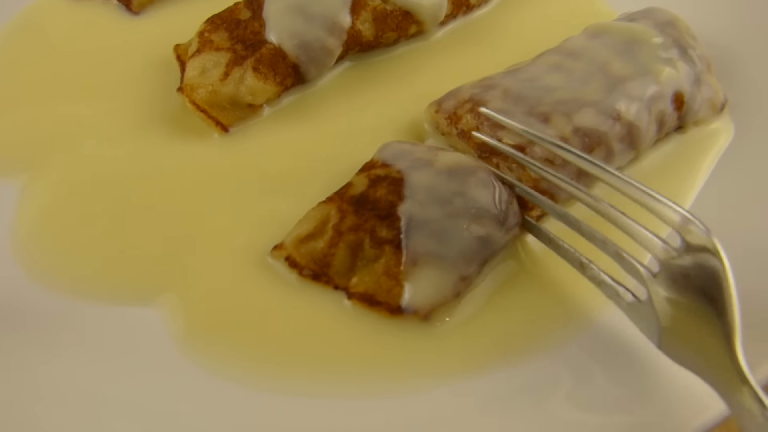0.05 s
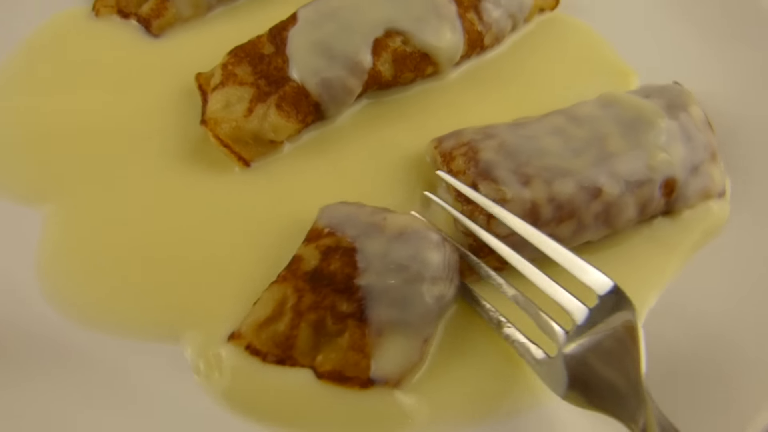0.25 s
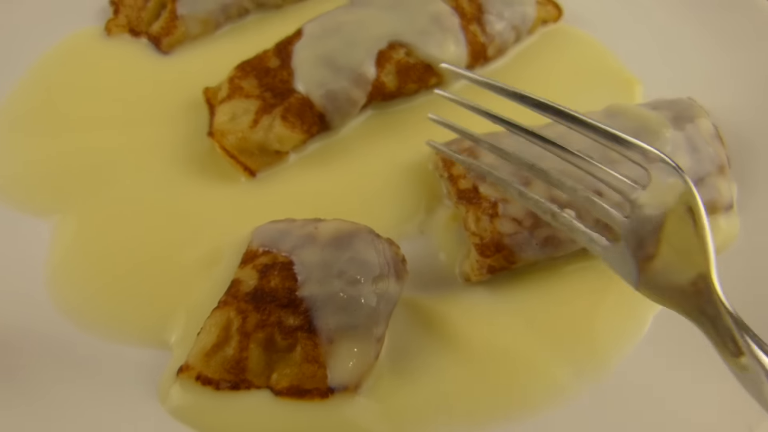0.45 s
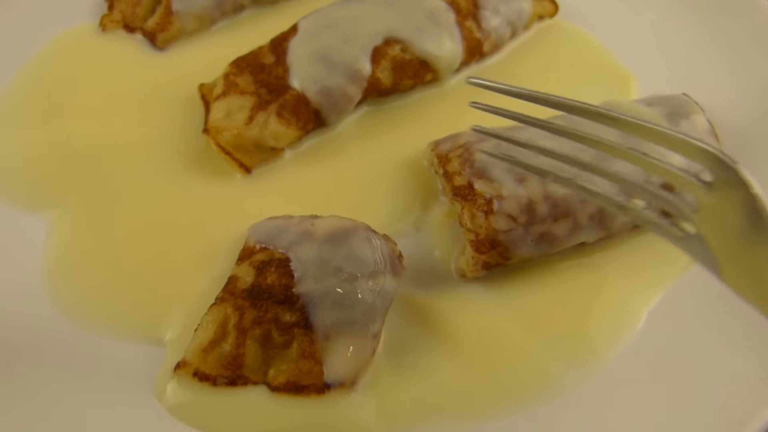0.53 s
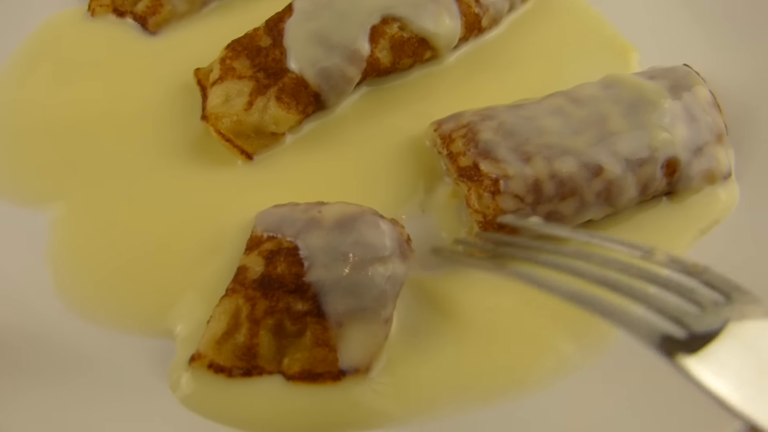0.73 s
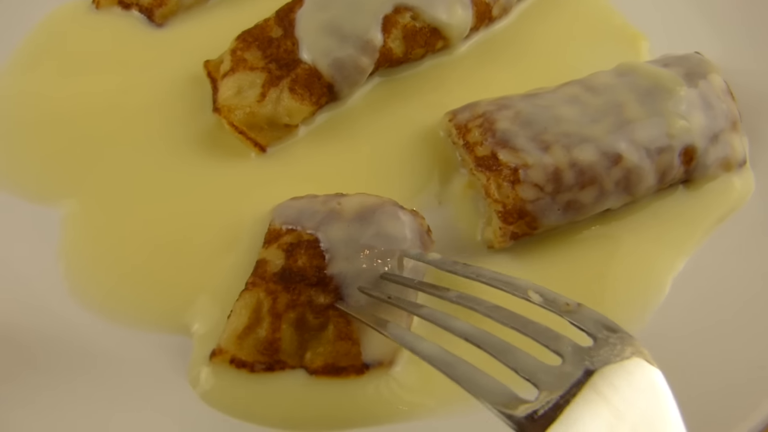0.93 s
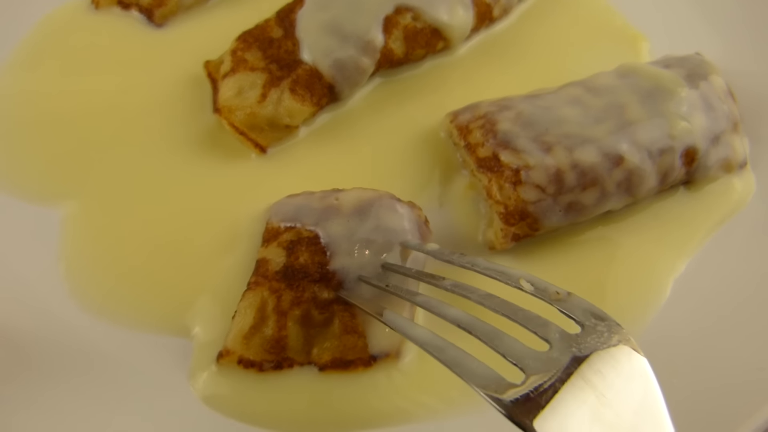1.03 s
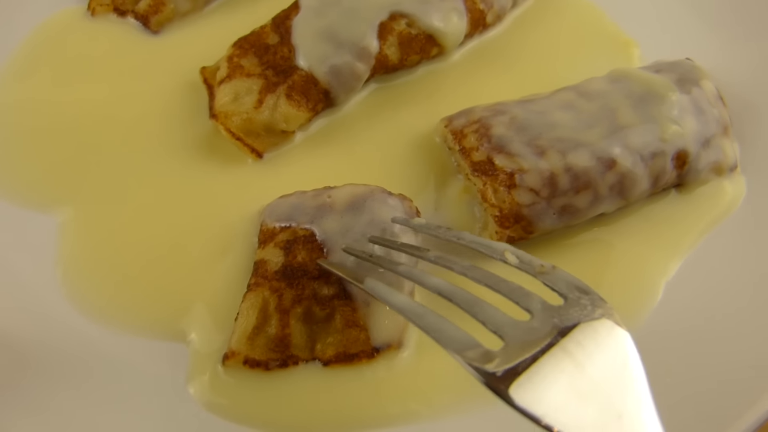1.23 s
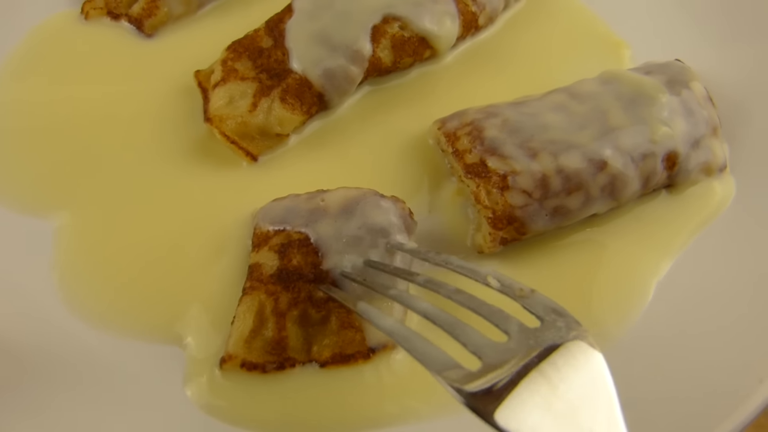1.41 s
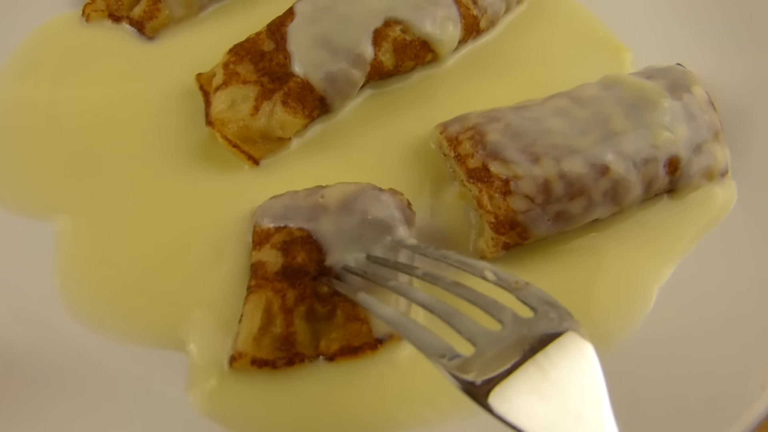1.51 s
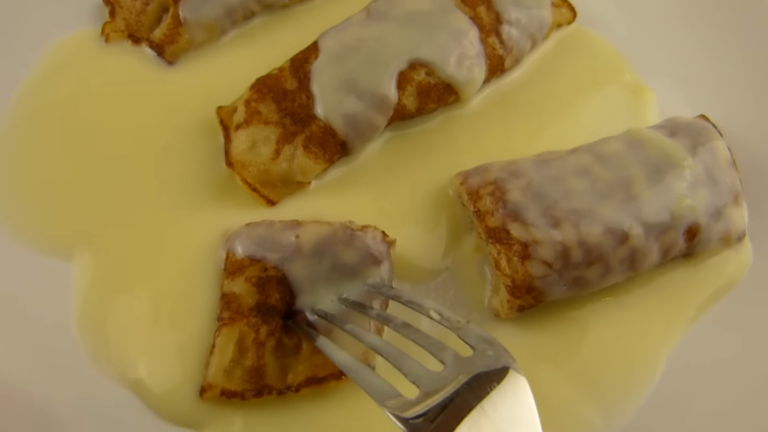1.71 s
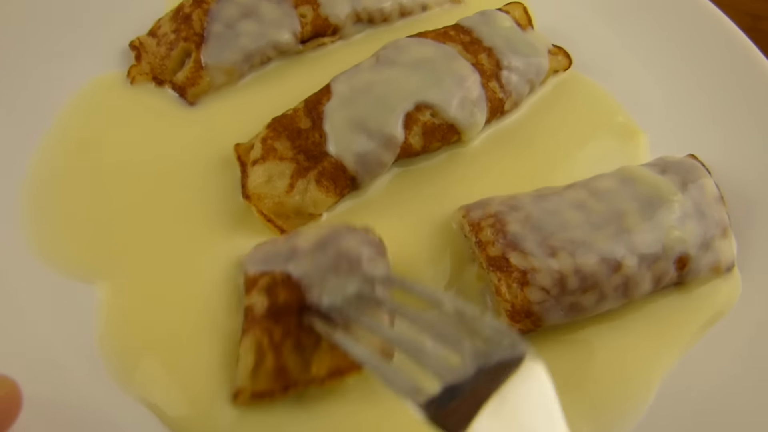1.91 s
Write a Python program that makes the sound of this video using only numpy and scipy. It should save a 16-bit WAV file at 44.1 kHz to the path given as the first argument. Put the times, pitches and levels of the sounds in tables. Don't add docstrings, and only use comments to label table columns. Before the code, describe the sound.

A fork hits a ceramic plate: after faint wet crackles over hiss, a loud sharp crack with a dull thud and bright ring lands at about 0.2 seconds. Light rebounds and gritty scraping follow, with a tiny squeak near 0.44, then the ring is cut short. Quiet hiss, hum and motor ticks remain. Around 1.7, soft wet smacks, a pop and fizz; a tine rings faintly at 1.9.

```python
import sys
import numpy as np
from scipy import signal
from scipy.fft import rfft, irfft
from scipy.io import wavfile
from scipy.ndimage import uniform_filter1d

SR = 44100
rng = np.random.default_rng(int(sys.argv[2]) if len(sys.argv) > 2 else 0)


def digitize_waveform(pressure):
    field = np.atleast_2d(pressure).T
    bounded = np.clip(field, -1, 1)
    quanta = np.round(bounded * 32767).astype(np.int16)
    wavfile.write(sys.argv[1], SR, quanta)


def boost(x):
    u = np.asarray(x, float) / 20
    return 10 ** u


N = 85995
STRIKE_S = .2179


def evened(x):
    return x / np.sqrt(np.mean(x ** 2) + 1e-20)


def read(points, hz):
    f, value = np.transpose(points)
    return np.interp(np.log(hz + 1), np.log(f + 1), value)


def level(points):
    s, db = np.transpose(points)
    return boost(np.interp(np.arange(N) / SR, s, db))


def add(mix, s, sound):
    part = mix[..., round(s * SR):][..., :sound.shape[-1]]
    part += sound[..., :part.shape[-1]]


def noise(table, size):
    colour = boost(read(table, np.fft.rfftfreq(size, 1 / SR)))
    return evened(irfft(rfft(rng.standard_normal(size)) * colour, size))


def ring(hz, t60, rise=0.00025, size=22050):
    t = np.arange(size) / SR
    return (1 - np.exp(-t / rise)) * boost(-60 * t / t60) * np.sin(2 * np.pi * hz * t)


def muted(x):
    mute_s, mute_db_per_s = .44, 400
    return x * boost(-mute_db_per_s * np.maximum(np.arange(N) / SR - mute_s, 0))


# pitch_hz, level_db, fade_t60_s
PLATE = [(1075, -16, .22), (1190, -18, .09), (1700, -19, .15), (1927, -16, .33), (2509, -21, .3),
         (3540, -12, .4), (4044, -16, .45), (4549, -2.5, .36), (5583, -2, .45), (6718, -7, .36),
         (6908, -11, .33), (7900, -11, .28), (9255, -13, .33), (10610, -15, .3)]
# pitch_hz, level_db, fade_t60_s
FORK = [(930, -21, .28), (2900, -27, .25), (3650, -15, .3), (4230, -16, .3), (4960, -16, .3),
        (5771, -15, .3), (6150, -22, .3), (8300, -18, .3), (8600, -19, .3), (9600, -21, .25),
        (12150, -20, .25), (13700, -25, .17)]


def body(damp):
    split, twin_db, twin_t60, tilt_db = .01, -4, .75, -1
    out = 0
    for hz, db, t60 in PLATE + FORK:
        mode = ring(hz, t60 * damp)
        for a, b in np.clip(rng.standard_normal((3, 2)), -2, 2):
            twin = ring(hz * (1 + split * a), t60 * damp * twin_t60)
            mode = mode + boost(twin_db) * np.sign(b) * twin
        out = out + boost(db + tilt_db * np.log2(hz / 5000)) * mode
    return out


# pitch_hz, level_db
CRACK = [(400, -46), (1100, -6.5), (2600, -16.5), (5300, 1.5), (7300, -15.5), (9400, -4.5), (16000, -33)]


def strike():
    strike_db, blow_db, thud_db, ring_db = -4.5, -8, -16.5, -33
    crack_t60, blow_t60 = .018, .09
    t, crack, tone = np.arange(8192) / SR, np.zeros(N), np.zeros(N)
    snap = np.minimum(t / .0004, 1) * noise(CRACK, size=8192) * boost(-60 * t / crack_t60)
    add(crack, STRIKE_S, boost(strike_db) * snap)
    add(crack, STRIKE_S, -boost(thud_db) * ring(680, .009))
    blow = body(0.35)[:8192] * boost(-60 * t / blow_t60)
    add(tone, STRIKE_S, boost(strike_db + blow_db) * blow)
    add(tone, STRIKE_S, boost(ring_db) * body(0.92))
    return crack, muted(tone)


# start_s, level_db
BOUNCES = [
    (0.271, -31.5),
    (.322, -39),
    (.344, -45),
    (0.41, -61),
]
# pitch_hz, level_db, fade_t60_s
BOUNCE = [(933, -16, .12), (1114, -19, 0.12), (1914, -14, 0.24), (3470, -12.5, 0.21), (3700, -11, 0.144),
          (4070, -10, 0.27), (4460, -8, .12), (4550, 3, .17), (4689, -9, 0.12), (4826, -12, .15),
          (5298, 0, 0.154), (5589, -7, .2), (5662, -14, 0.14), (6770, -15, .14)]


def bounces():
    shake = 0.55
    out = np.zeros(N)
    for s, db in BOUNCES:
        for hz, mode_db, t60 in BOUNCE:
            v = rng.standard_normal()
            add(out, s, boost(db + mode_db + 2 * v) * ring(hz * (1 + .002 * v), t60, .001))
    flutter = evened(uniform_filter1d(uniform_filter1d(rng.standard_normal(N), 150), 150))
    return muted(out * (1 - shake + shake * flutter))


# time_s, level_db
DRAG = [
    (.225, -58),
    (.262, -43),
    (0.271, -37.5),
    (.33, -43),
    (.39, -55.5),
    (.415, -51),
    (.445, -54.5),
    (.46, -63.5),
    (.49, -63),
]
# pitch_hz, level_db
GRIT = [(300, -35), (1000, 1), (2500, -6.5), (5400, 2), (9000, -2.5), (12000, -23), (15000, -35)]


def drag():
    slips_per_s, damp, grit_db = 1500, .17, -3.5
    size = boost(3.5 * np.minimum(rng.exponential(1, N), 3))
    slips = size * (rng.random(N) < slips_per_s / SR) * rng.choice([-1, 1], N)
    push = level([(DRAG[0][0] - .004, -120)] + DRAG + [(DRAG[-1][0] + 0.029, -100)])
    tone = body(damp)
    grit = noise(GRIT, size=N) * evened(uniform_filter1d(abs(slips), 40) + .1)
    scrape = signal.oaconvolve(evened(slips) * push, tone / np.linalg.norm(tone))[:N]
    return scrape + boost(grit_db) * grit * push + squeak()


# time_s, pitch_hz, level_db
SQUEAK = [
    (.405, 4300, -75),
    (.425, 4700, -53),
    (.445, 5100, -49),
    (.46, 5500, -56),
    (.47, 5600, -78),
]


def squeak():
    s, hz, db = np.transpose(SQUEAK)
    t = np.arange(N) / SR
    rough = evened(uniform_filter1d(rng.standard_normal(N), 70))
    tone = np.sin(2 * np.pi * np.cumsum(np.interp(t, s, hz)) / SR)
    return boost(np.interp(t, s, db, -150, -150)) * rough * tone


# start_s, peak_db, pitch_hz
SMACKS = [(.0178, -54, 5300), (.1438, -55, 7500), (.2, -53, 5500), (.4145, -48, 5000), (.4748, -49, 7000),
          (1.6636, -41, 6800), (1.667, -50, 8000), (1.6684, -49, 7800), (1.6697, -52, 8500),
          (1.6965, -54, 4200), (1.7082, -50, 6100), (1.7176, -48, 5800), (1.7225, -56, 7500),
          (1.7284, -45, 5800), (1.7302, -51, 6400), (1.7328, -53, 6000), (1.7348, -54, 6200)]
# pitch_ratio, signed_share, fade_t60_s
SMACK = [(1, 1, .0035), (1.2, -.5, .002), (1.5, .45, .002), (.8, -.55, .0025), (.58, .3, .002)]
# start_s, peak_db, pitch_hz
POPS = [
    (0.1914, -46, 1498),
    (1.672, -44.5, 2260),
]
# pitch_ratio, signed_share, fade_t60_s
POP = [(1, 1, .007), (.72, -.9, .009), (1.22, -.7, .006), (.58, .5, .008)]
# delay_s, level_db
POP_ECHO = [(0, 0), (.0013, -5), (.0024, -8), (.004, -7), (.0065, -13), (.0095, -14), (.0125, -14),
            (.0155, -16)]
# start_s, length_s, level_db
SQUISH = [
    (.165, .035, -66),
    (.462, .03, -61),
    (1.664, .034, -61),
    (1.707, .018, -69),
    (1.729, .026, -64),
]


def food():
    out = np.zeros(N)
    for s, db, hz in SMACKS:
        for ratio, share, t60 in SMACK:
            add(out, s, boost(db + 1.5) * share * ring(hz * ratio, t60, .00012, size=600))
    for s, db, hz in POPS:
        for late, echo_db in POP_ECHO:
            for ratio, share, t60 in POP:
                detune = rng.uniform(1.0, 1.0)
                part = share * ring(hz * ratio * detune, t60, .0001, size=900)
                add(out, s + late, boost(db + echo_db) * part)
    squish_hz, width_hz = 6000, 8000
    fizz = noise([(squish_hz / 6, -12), (squish_hz / 3, -2), (squish_hz, 0), (squish_hz + width_hz, -16)], size=N)
    fizz = fizz * evened(uniform_filter1d(rng.exponential(1, N) ** 2.6, 40))
    for s, length, db in SQUISH:
        u = np.arange(0, length * 2, 1 / SR) / length
        swell = boost(db - 12 * u ** 2) * np.minimum(u / 0.069, 1)
        add(out, s, swell * fizz[round(s * SR):][:len(u)])
    add(out, 1.9, boost(-58.5) * ring(5420, 0.1, 0.0012, size=4000))
    return out


# pitch_hz, width_hz, level_db
FAINT_BANDS = [(7300, 200, -25), (10050, 130, -18), (11300, 450, -22), (12900, 450, -25), (15200, 1000, -25)]


def thin_bands(x):
    hz = np.fft.rfftfreq(N, 1 / SR)
    dips_db = sum(db * np.exp(-((hz - f) / w) ** 4) for f, w, db in FAINT_BANDS)
    return irfft(rfft(x) * boost(dips_db), N) * (np.arange(N) > STRIKE_S * SR)


# pitch_hz, fade_t60_s
ROOM = [(300, .06), (800, .16), (2000, .3), (5500, .24), (10000, .22), (13000, .15)]


def room(x):
    taps = np.zeros((2, SR // 2))
    at = np.arange(160, SR // 2 - 20, 20)
    places = at + rng.integers(0, 20, (2, len(at)))
    np.put_along_axis(taps, places, rng.choice([-1., 1.], (2, len(at))), 1)
    hz, t, z = signal.stft(taps, SR, nperseg=256)
    fade = boost(-60 * t / read(ROOM, hz)[:, None])
    tail = signal.istft(z * fade, SR, nperseg=256)[1]
    tail = np.array([tail[0] + .7 * tail[1], tail[0] - .7 * tail[1]])
    return signal.fftconvolve(x[None], tail / np.linalg.norm(tail[0]), axes=1)[:, :N]


# pitch_hz, phase_radians
TURN = [(100, 1.8), (250, 2.0), (600, 1.3), (1200, .8), (4000, .45), (12000, .3)]
# pitch_hz, level_db
LEAN = [(125, 1), (300, 0.5), (600, -7.5), (1200, 3.5), (2500, -3), (5000, 0.5), (9000, 2), (13000, -1.5)]


def ports(x):
    hz = np.fft.rfftfreq(N, 1 / SR)
    half = boost(read(LEAN, hz) / 2) * np.exp(.5j * read(TURN, hz))
    low_cut = signal.butter(3, 100, "high", fs=SR, output="sos")
    return irfft(rfft(signal.sosfilt(low_cut, x)) * np.array([half, 1 / half]), N)


# start_s, peak_db
TICKS = [(0.5183, -57.5), (0.5506, -61), (0.5764, -54.5), (0.6116, -59), (0.6718, -54.5), (0.698, -68),
         (0.7319, -56.5), (0.7582, -60), (0.792, -58.5), (0.8175, -59), (0.852, -60), (0.9386, -59.5),
         (0.9715, -70), (1.091, -67), (1.1171, -59.5), (1.1511, -57), (1.237, -58), (1.2719, -59),
         (1.297, -61), (1.3329, -58), (1.3579, -58), (1.4584, -59.5), (1.478, -57.5), (1.5205, -66),
         (1.572, -63), (1.6711, -85), (1.7784, -75.5), (1.7913, -55.5), (1.8194, -60), (1.8805, -61),
         (0.0983, -54.5),
    (0.139, -58),
    (0.1577, -59),
    (0.1913, -57.5),
]
COGS_S = [.012, .0375, .057]
# time_s, level_db
HUM = [(0.0, -79.5), (0.172, -69), (0.228, -72), (0.26, -85.5), (0.76, -77.5), (0.808, -86.5),
       (0.846, -70.5), (1.052, -68), (1.124, -78.5), (1.178, -68.5), (1.542, -83), (1.95, -90)]


def camera():
    tick_hz, tick_t60, tick_db, cog_db, turn_s = 1645, .03, 0.5, -68, .06
    out = np.zeros(N)
    for (s, db), a in zip(TICKS, rng.standard_normal(40)):
        add(out, s, boost(db + tick_db) * ring(tick_hz * (1 + 0.01 * a), tick_t60, 0.00055, size=3000))
    cogs = (np.arange(0, N / SR - turn_s, turn_s)[:, None] + COGS_S).ravel()
    for s in cogs:
        a, b = rng.standard_normal(2)
        knock = ring(tick_hz * (1 + .02 * b), tick_t60, 0.00054, size=3000)
        add(out, s + .001 * b, boost(cog_db + 3.8 * a) * knock)
    hum_hz, width_hz, rough = 301, 25, .3
    z = uniform_filter1d(rng.standard_normal((2, N)), round(SR / width_hz / 2), axis=1)
    waver = 1 - rough + rough * (evened(z[0]) + 1j * evened(z[1]))
    wave = waver * np.exp(2j * np.pi * hum_hz * np.arange(N) / SR)
    return out + evened(wave.real) * level(HUM)


# pitch_hz, level_db
AIR = [(20, -3), (216, 1.5), (1370, -3.5), (2320, -10), (6000, -9.5), (11600, -12.5), (15100, -17),
       (16200, -22.5)]
# pitch_hz, level_db
WIDE = [(12, -48), (20, -27), (81, -12), (347, 3.5), (780, -1.5), (5080, -21.5), (5850, -20), (6360, -30),
        (16000, -55)]
# fully_thin_s, returning_s, full_again_s
THIN_S = (.23, .34, .42)


def background():
    mid = boost(-65) * noise(AIR, size=N) + camera()
    side = boost(-61) * noise(WIDE, size=N)
    thin = np.interp(np.arange(N) / SR, [THIN_S[0] - .005, *THIN_S], [0, 1, 1, 0])
    mid = mid + thin * (thin_bands(mid) - mid)
    return np.array([mid + side, mid - side])


def scene():
    crack, tone = strike()
    hit = crack + (tone + bounces())
    quiet = background()
    table = ports(hit + thin_bands(drag()) + food())
    echo = boost(-11.5) * thin_bands(room(hit))
    return table + echo + quiet


def roll_off(x):
    return signal.sosfilt(signal.butter(12, 15700, fs=SR, output="sos"), x)


def record(dry):
    mix = np.clip(dry, -1, 1)
    return roll_off(mix)


dry = scene()
out = record(dry)
digitize_waveform(out)
```